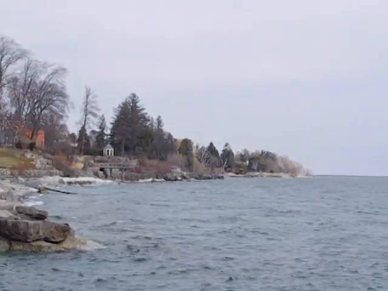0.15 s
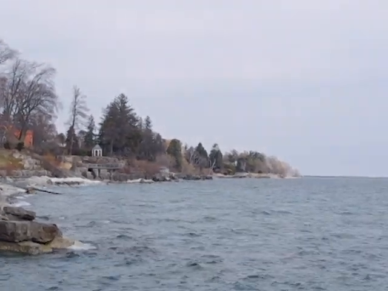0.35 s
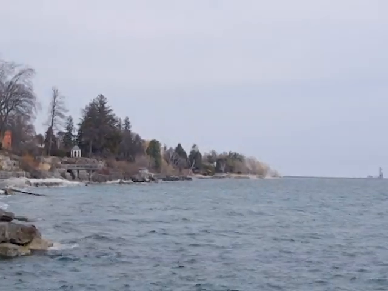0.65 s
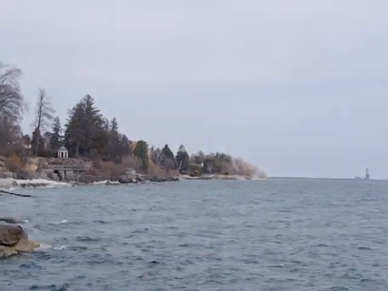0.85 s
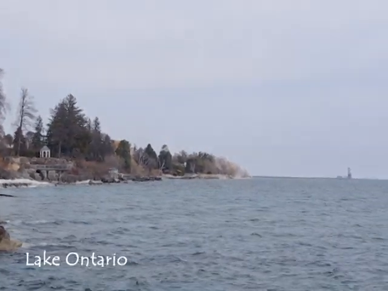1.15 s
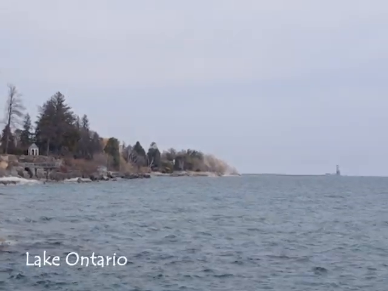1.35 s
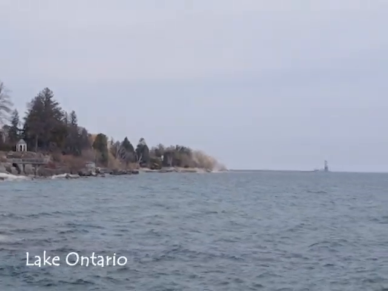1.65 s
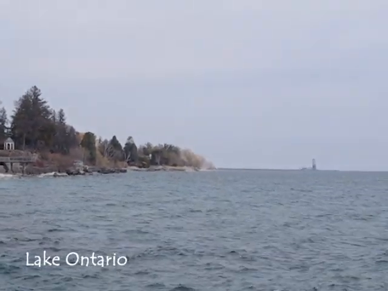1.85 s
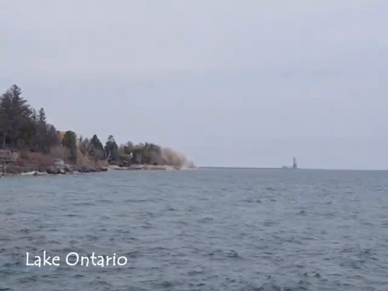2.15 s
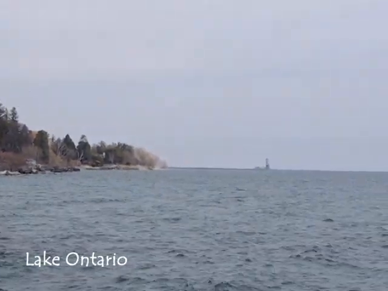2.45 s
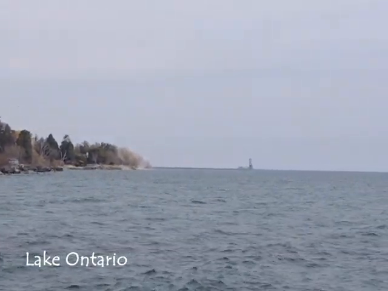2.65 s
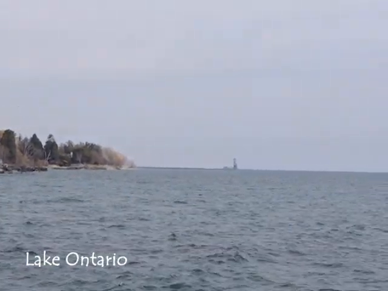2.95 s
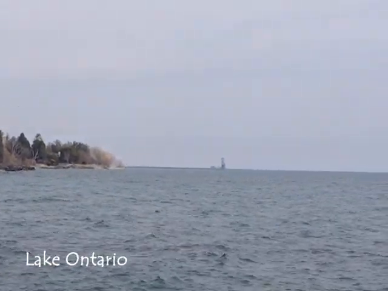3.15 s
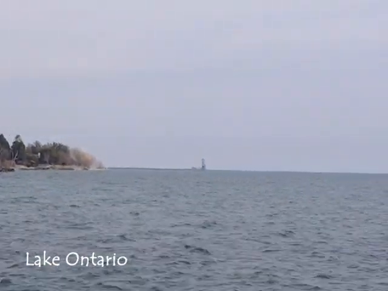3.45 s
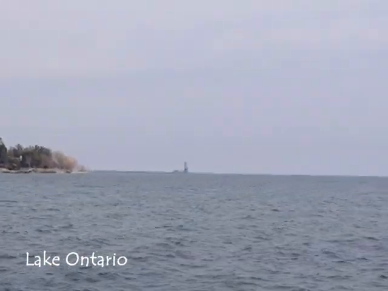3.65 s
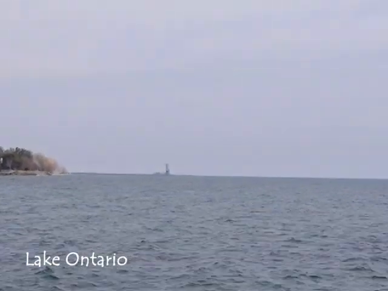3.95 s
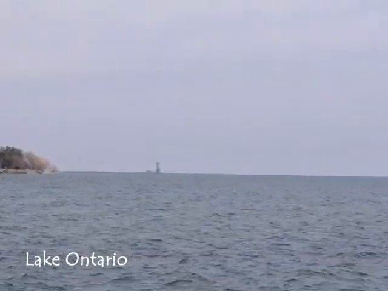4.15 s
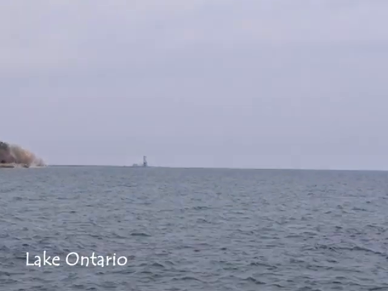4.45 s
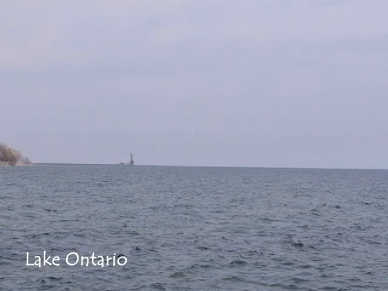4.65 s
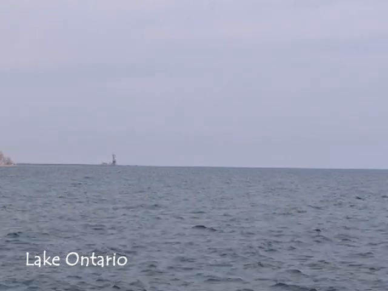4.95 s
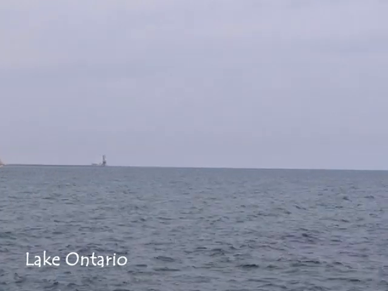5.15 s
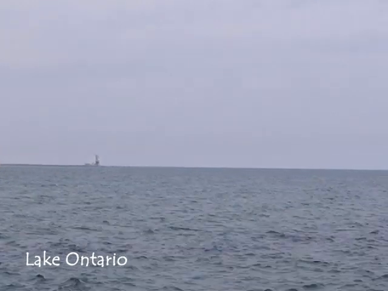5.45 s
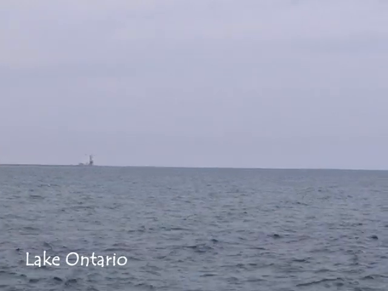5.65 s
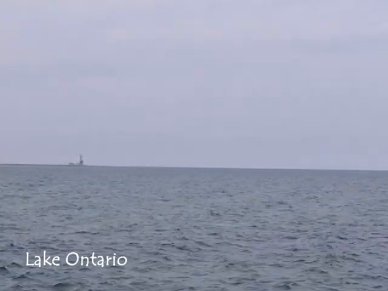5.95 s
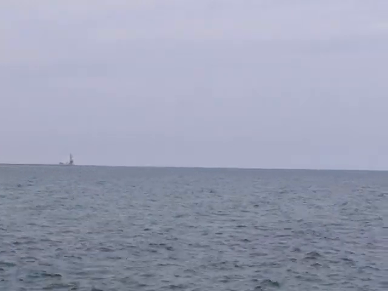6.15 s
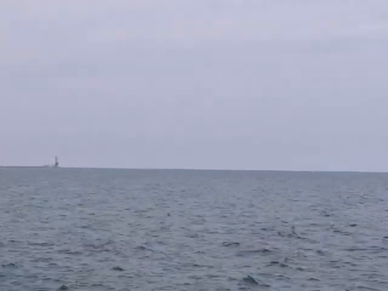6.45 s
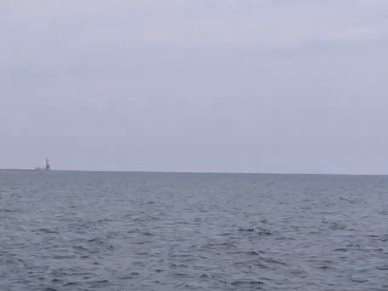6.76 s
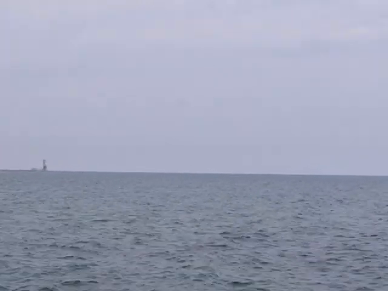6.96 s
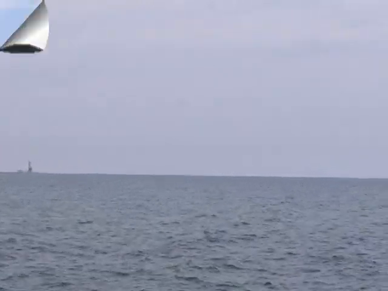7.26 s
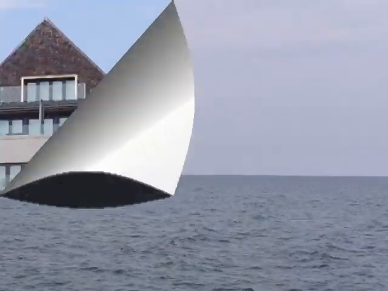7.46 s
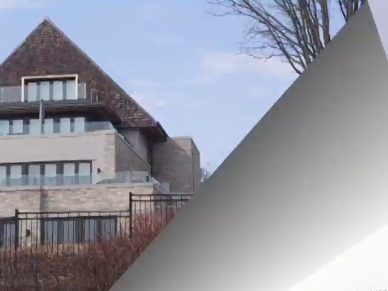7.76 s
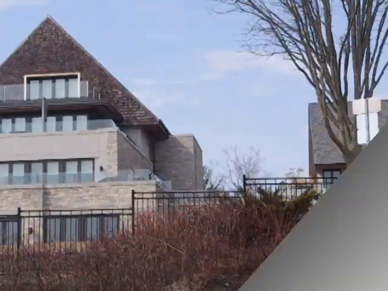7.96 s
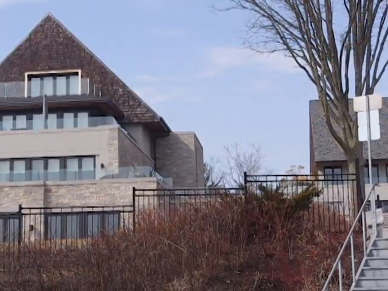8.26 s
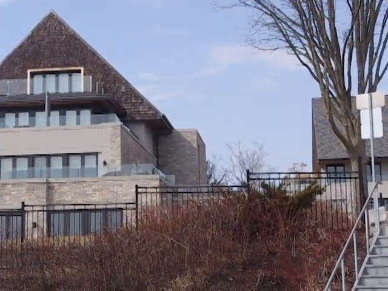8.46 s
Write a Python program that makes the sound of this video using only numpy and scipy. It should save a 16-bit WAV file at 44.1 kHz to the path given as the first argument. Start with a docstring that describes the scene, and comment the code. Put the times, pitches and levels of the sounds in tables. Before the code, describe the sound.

Restless small waves rush over shoreline rocks with hissing spray, plops and ticking droplets, as wind buffets a small microphone throughout, then sudden silence.

```python
"""Choppy lake water washes a stone wall and rocks, with fizzing spray, bubbles, near drops and wind throughout.
Wash and spray are noise in drifting third-octave bands; bubbles, gulps and drops are short rings.
Wind on one small microphone adds low noise in gusts, ringing thumps and slow pressure pushes.
A limiter ducks the strongest peaks, above all the deepest pushes; the sound stops short into silence."""
import sys
import numpy as np
from scipy import signal
from scipy.io import wavfile

SR = 44100
rng = np.random.default_rng(int(sys.argv[2]) if len(sys.argv) > 2 else 0)


def master(y):
    """Save y as 16-bit WAV."""
    cut = np.clip(np.atleast_2d(y).T, -1, 1)
    pcm = np.round(cut * 32767)  # scale
    wavfile.write(sys.argv[1], SR, pcm.astype(np.int16))


N = 378819      # samples, about 8.6 s

# All levels stand ahead of the microphone and the limiter.
# swell of the water at the wall: t/s, wash level/dB, spray level/dB
WATER_SWELL = [(0.0, -34.5, -27.5), (0.08, -27, -28), (0.2, -30, -32), (0.6, -29, -30), (0.88, -31, -36.5),
               (1.2, -30, -35), (1.5, -33, -36.5), (1.93, -31, -36.5), (2.66, -28.5, -32.5),
               (2.95, -25.5, -28), (3.25, -27, -28), (3.63, -25.5, -28), (3.96, -28.5, -32.5),
               (4.95, -28, -32), (5.5, -29.5, -32), (5.8, -27, -29.5), (6.45, -27.5, -28),
               (6.8, -29.5, -28), (7.1, -30.5, -33), (7.72, -31, -32.5)]
# wavelets slapping the rocks: t/s, change of wash level/dB, change of spray level/dB
SLAPS = [(0.99, 2, 3), (1.3, 3, 5), (1.36, 3, 4.5), (1.44, 1.5, 3.5), (2.12, -1, 3), (2.735, 1.5, 1.5),
         (3.07, 3, -5), (3.14, 0, 0.3), (4.45, 0.5, 0), (5.135, 6, -0.5), (5.72, 3, 4.5), (6.19, 1.5, 1),
         (6.6, 0, 5), (6.72, 5, 2.5), (6.985, 4.5, 1.5), (7.052, 2, 3.5), (7.151, 0.5, 5)]
# fineness of the spray: t/s, lift of its top octave level/dB
SPRAY_FINENESS = [(0, 3.5), (1.2, 0), (3.5, 2), (5.3, 1.8), (6.2, -3.5), (7.72, 0.5)]
# colour of the wash: f/Hz, relative level per Hz/dB
WASH_SPECTRUM = [(200, -14), (350, -2.5), (550, 1), (800, -1.5), (1200, -4), (2000, -10.5), (2800, -12.5),
                 (4000, -33.5)]
# colour of the spray: f/Hz, relative level per Hz/dB
SPRAY_SPECTRUM = [(1500, 0), (2800, -1.5), (4000, -2.5), (6500, -5), (9000, -4.5), (12000, -8.5),
                  (15500, -3)]
# large bubbles and gulps between the rocks: t/s, peak level/dB, f/Hz
ROCK_GULPS = [(0.6852, -18, 2960), (2.7671, -20, 730), (2.8058, -21.5, 3047), (3.1999, -20.5, 1010),
              (4.0807, -19.5, 1110), (4.0905, -17, 460), (4.4514, -20, 998), (5.1287, -17.5, 1950),
              (5.1362, -13, 760), (5.2179, -19, 2200), (5.267, -20, 342), (5.345, -18, 364),
              (5.7275, -20.5, 1268), (6.2005, -18.5, 670), (6.5881, -15, 1220), (6.6584, -23, 921),
              (6.7202, -14.5, 715), (6.9367, -21, 1487), (6.9927, -19, 474), (7.1431, -20, 1060),
              (7.1476, -19, 1900), (7.185, -23, 304), (7.3187, -18, 2215), (7.432, -22.5, 790)]
# drops ticking on stone and water close by: t/s, peak level/dB, f/Hz
NEAR_DROPS = [(0.0579, -26, 8816), (0.2679, -14.5, 8384), (1.2849, -19, 6794), (1.3567, -21, 5563),
              (1.6451, -17.5, 5040), (2.1194, -17.5, 3700), (2.2415, -19, 6590), (2.294, -20, 8900),
              (2.394, -18, 11500), (2.7346, -8, 5160), (2.8386, -12, 9326), (4.0445, -12, 9450),
              (4.1326, -20, 8259), (4.1687, -14, 7303), (4.418, -21, 8926), (4.5448, -15, 8800),
              (4.7803, -18, 5329), (5.8495, -13, 8463), (6.0498, -14.5, 8659), (6.5518, -12, 7455),
              (6.5834, -16, 7723), (6.6079, -15.5, 4846), (6.6661, -9, 9081), (7.1477, -13.5, 8140),
              (7.3459, -12, 9600), (7.6689, -20, 5303), (7.6994, -20, 5700)]
# steady wind on the microphone: t/s, buffeting level/dB, rumble level/dB
STEADY_WIND = [(0.0, -34.5, -39.5), (0.45, -38, -45), (1.3, -35, -37), (1.7, -33, -27), (2.4, -40, -38.5),
               (2.9, -28.5, -33), (3.5, -28, -39), (4.0, -31, -33), (4.8, -31.5, -28.5), (5.45, -33.5, -41),
               (6.0, -38, -35), (6.4, -32, -26.5), (6.9, -36.5, -40), (7.2, -34.5, -33), (7.72, -37, -40)]
# gusts on the microphone: t/s, buffeting level/dB, rumble level/dB, rise and fall to 1/e each/s
WIND_GUSTS = [(0.26, -46, -38, 0.041), (0.554, -25, -26, 0.057), (1.09, -31, -35, .04),
              (1.57, -30, -27, 0.081), (1.96, -46, -37, 0.074), (2.286, -29.5, -41, 0.049),
              (2.56, -23, -28, 0.046), (2.957, -25.5, -30, 0.044), (3.39, -27, -31, 0.06),
              (3.732, -21, -36, 0.014), (4.138, -32, -29, 0.045), (4.557, -31, -26, 0.031),
              (4.896, -33, -18, 0.041), (5.105, -26, -26, 0.066), (5.307, -30.5, -38, 0.068),
              (5.723, -32, -36, 0.068), (6.766, -39, -27, 0.051), (7.004, -38, -20.5, 0.097),
              (7.54, -33, -19.5, 0.05)]
# eddies thumping the microphone: t/s, peak level/dB, f/Hz
EDDY_THUMPS = [(0.255, -21, 150), (0.5348, -14, 313), (0.554, -18, 342), (1.0944, -24, 140),
               (1.4704, -14.5, 227), (1.5412, -14.5, 230), (1.5615, -15, 170), (1.6, -17, 200),
               (1.6201, -14, 180), (2.4914, -16, 212), (2.5441, -12, 280), (2.5663, -16, 284),
               (2.65, -17, 170), (2.9291, -8, 446), (2.9463, -10, 307), (3.0046, -8.5, 274),
               (3.2971, -11, 282), (3.3652, -16, 392), (3.3724, -8.5, 335), (3.7075, -14, 260),
               (3.7245, -10, 288), (3.7754, -11, 335), (3.786, -14, 380), (3.842, -14, 350),
               (4.499, -16, 205), (4.5533, -14, 232), (4.572, -10.5, 260), (4.882, -15, 230),
               (4.9015, -16, 297), (5.0834, -11, 293), (5.0997, -15, 200), (5.112, -18, 290),
               (6.7693, -16, 159), (6.7808, -16, 198), (6.9474, -11.5, 188), (7.01, -28, 199),
               (7.105, -19, 160), (7.5515, -14.5, 236)]
# slow pressure pushes of the gusts: t/s, peak level/dB
PRESSURE_PUSHES = [(3.004, -12), (3.372, -12), (3.725, -4), (4.556, -13), (6.772, -10.5), (6.949, -5),
                   (7.013, -6.5)]
# colour of the buffeting: f/Hz, relative level per Hz/dB
BUFFET_SPECTRUM = [(80, -4), (160, -6), (300, 0), (450, -6.5), (800, -17)]
# colour of the deep rumble: f/Hz, relative level per Hz/dB
RUMBLE_SPECTRUM = [(20, -10), (60, 5), (100, -8), (200, -12.5)]

SLAP_RISE_S, SLAP_FALL_S = 0.03, 0.0097     # to 1/e
GULP_CYCLES, DROP_CYCLES, THUMP_CYCLES = 6.2, 3.7, 0.85     # width of each ring at half height
PORT_HZ, PORT_WIDTH_HZ, PORT_DB = 9520, 1530, 2     # resonance of the microphone port
ROLL_OFF_HZ = 9560      # the microphone falls steeply above this
STOP_S, CUTOFF_HZ = 7.7255, 15050       # end of the sound, top of the final band


def water():
    """Wash, bubbles and spray swell together with the slaps; the nearest gulps and drops ring on top."""
    slaps = sum(np.outer(db, hump(s, SLAP_RISE_S, SLAP_FALL_S)) for s, *db in SLAPS)
    wash_db, spray_db = in_time(WATER_SWELL) + slaps
    foam = bubbles(per_s=250, cycles=32, low_hz=375.0, high_hz=3400)
    body = wash() + from_db(-7.5) * foam
    return from_db(wash_db) * body + from_db(spray_db) * spray() + gulps() + drops()


def wash():
    """The broad rush of water on stone: noise whose bands flicker together and singly; rms 1."""
    return banded(rng.standard_normal((2, N)), WASH_SPECTRUM, shared_db=0.47, own_db=1.2, rate_hz=11)


def spray():
    """Fizz of noise and droplet clicks; finer drops hiss higher, so fineness lifts the top."""
    droplets = grainy(per_s=93, spread_db=6.0, share=0.15)
    fizz = banded(droplets, SPRAY_SPECTRUM, shared_db=0.82, own_db=1.0, rate_hz=35)
    top = signal.sosfilt(signal.butter(2, 7000, "high", fs=SR, output="sos"), fizz)
    lift = from_db(in_time(SPRAY_FINENESS)[0])
    return fizz + (lift - 1) * top


def bubbles(per_s, cycles, low_hz, high_hz):
    """Small bubbles born at random ring at 20 pitches, falling 60 dB in the given cycles; rms 1."""
    sizes = from_db(3.2 * np.minimum(rng.exponential(1, N), 5)) * rng.choice([-1, 1], N)
    born = rng.random(N) < per_s / SR
    pitch_index = rng.integers(0, 20, N)
    out = 0
    for k, hz in enumerate(np.geomspace(low_hz, high_hz, 20)):
        r = from_db(-60 * hz / (cycles * SR))
        w = 2 * np.pi * hz / SR
        strikes = sizes * born * (pitch_index == k) + 1e-18
        out = out + signal.lfilter([0, np.sin(w)], [1, -2 * r * np.cos(w), r * r], strikes)
    return rms_one(out)


def gulps():
    """Large bubbles between the rocks: several cycles of ringing in a weak flurry."""
    return bursts(ROCK_GULPS, GULP_CYCLES, skirt_db=-13, skirt_width=1.7)


def drops():
    """Drops close by: brief high rings in a strong flurry lasting more cycles than the gulps'."""
    return bursts(NEAR_DROPS, DROP_CYCLES, skirt_db=-5.5, skirt_width=4.1)


def wind():
    """Air moving over the microphone: buffeting and rumble in gusts, thumps and pressure pushes."""
    buffet = banded(rng.standard_normal((2, N)), BUFFET_SPECTRUM, shared_db=0.5, own_db=1.5, rate_hz=19.0)
    rumble = banded(rng.standard_normal((2, N)), RUMBLE_SPECTRUM, shared_db=5.0, own_db=2.0, rate_hz=18)
    steady = from_db(in_time(STEADY_WIND))
    gusts = sum(np.outer(from_db(db), hump(s, length_s, length_s)) for s, *db, length_s in WIND_GUSTS)
    buffet_gain, rumble_gain = np.hypot(steady, gusts)      # powers add
    return buffet_gain * buffet + rumble_gain * rumble + thumps() + pushes()


def thumps():
    """Eddies striking the microphone: less than a cycle of low ringing in a faint flurry."""
    return bursts(EDDY_THUMPS, THUMP_CYCLES, skirt_db=-27, skirt_width=4.0)


def pushes(rise_s=0.0039, fall_s=0.029):
    """One-sided pressure on the diaphragm, with a quick rise and slower fall (each to 1/e)."""
    return sum(from_db(peak_db) * hump(s, rise_s, fall_s) for s, peak_db in PRESSURE_PUSHES)


def microphone(x):
    """The port resonance lifts a band near the top, then the response falls away."""
    r = np.exp(-np.pi * PORT_WIDTH_HZ / SR)
    feed = (1 - r * r) / 2 * np.array([1, 0, -1])
    back = [1, -2 * r * np.cos(2 * np.pi * PORT_HZ / SR), r * r]
    lifted = x + from_db(PORT_DB) * signal.lfilter(feed, back, x)
    return signal.sosfilt(signal.butter(5, ROLL_OFF_HZ, fs=SR, output="sos"), lifted)


def banded(source, spectrum, shared_db, own_db, rate_hz):
    """Third-octave bands of a source, each with its level, a shared swell and its own flicker; rms 1."""
    hz_low, hz_high = spectrum[0][0], min(spectrum[-1][0], .45 * SR)
    edges = hz_low * 2 ** np.arange(0, np.log2(hz_high / hz_low) + .2, 1 / 3)
    out, together = 0, drift(rate_hz)
    for k, (low, high) in enumerate(zip(edges, edges[1:])):
        band_filter = signal.butter(2, [low, high], "band", fs=SR, output="sos")
        band = signal.sosfilt(band_filter, source[k % 2])       # neighbours use different draws
        level_db = at_hz(spectrum, np.sqrt(low * high))
        out = out + from_db(level_db + shared_db * together + own_db * drift(rate_hz)) * band
    return rms_one(out)


def grainy(per_s, spread_db, share):
    """Two white noises over one clustered scatter of uneven clicks; share is the clicks' part of the power."""
    sizes = from_db(spread_db * np.minimum(rng.exponential(1, N), 4.5)) * rng.choice([-1, 1], N)
    density = per_s * from_db(5.0 * drift(4.0)) / SR
    clicks = rms_one(sizes * (rng.random(N) < density))
    share = np.clip(share, 0, 1)
    return np.sqrt(share) * clicks + np.sqrt(1 - share) * rng.standard_normal((2, N))


def bursts(table, cycles, skirt_db, skirt_width):
    """Each row is a bell-shaped ring inside a longer, weaker flurry of noise around its pitch."""
    out, t = np.zeros(N), np.arange(-2000, 2000) / SR
    noise = rng.standard_normal((len(table), len(t)))
    phase = rng.uniform(0, 2 * np.pi, len(table))
    for (s, peak_db, hz), hiss, start in zip(table, noise, phase):
        bell = lambda turns: .5 ** ((2 * t * hz / turns) ** 2)
        edges = [hz / 2.14, min(hz * 1.76, .45 * SR)]
        flurry = rms_one(signal.sosfilt(signal.butter(2, edges, "band", fs=SR, output="sos"), hiss))
        ring = bell(cycles) * np.cos(2 * np.pi * hz * t + start)
        shape = ring + from_db(skirt_db) * bell(skirt_width * cycles) * flurry
        first = round(s * SR) - 2000
        out[first:][:len(t)] += from_db(peak_db) * shape / np.abs(shape).max()
    return out


def drift(rate_hz):
    """Slow chance: noise through a double one-pole low-pass, worked at SR / 20; rms 1."""
    r = np.exp(-40 * np.pi * rate_hz / SR)
    noise = rng.standard_normal(N // 20 + 2002)
    slow = signal.lfilter([1], [1, -2 * r, r * r], noise)[2000:]      # past the filter's start
    return np.interp(np.arange(N) / 20, np.arange(len(slow)), rms_one(slow))


def hump(s, rise_s, fall_s):
    """A bell in time of height 1 at s, with its own rise and fall."""
    t = np.arange(N) / SR
    return np.exp(-((t - s) / np.where(t < s, rise_s, fall_s)) ** 2)


def in_time(rows):
    """Curve columns at every sample."""
    s, *columns = np.transpose(rows)
    return [np.interp(np.arange(N) / SR, s, c) for c in columns]


def at_hz(points, hz):
    """A spectrum read on a log-frequency axis."""
    point_hz, point_db = np.array(points).T
    return np.interp(np.log(hz), np.log(point_hz), point_db)


def from_db(db):
    """Gain of a level in dB."""
    return 10 ** (np.asarray(db) / 20)


def rms_one(x):
    """Scaled to rms 1."""
    return x / np.sqrt(np.mean(x ** 2) + 1e-20)


def scene():
    """Water and wind at one point, the same in both channels."""
    return np.tile(water() + wind(), (2, 1))


def record(dry, limit_db=-12.5, release_db_s=260, attack_s=0.0012, bass_cut_hz=140):
    """A limiter acts on the full pressure, then the bass is cut, the sound stops and the top is cut."""
    heard = microphone(dry)
    r = np.exp(-1 / (attack_s * SR))
    smooth = lambda x: signal.lfilter([1 - r], [1, -r], x)
    power_db = 10 * np.log10(smooth(heard[0] ** 2) + 1e-12)
    over = np.maximum(power_db - limit_db, 0)
    ramp = release_db_s * np.arange(N) / SR
    held = np.maximum.accumulate(over + ramp) - ramp      # falls back at a steady dB rate
    limited = heard * from_db(-smooth(held))
    cut = signal.sosfilt(signal.butter(3, bass_cut_hz, "high", fs=SR, output="sos"), limited)
    cut = cut * np.clip((STOP_S - np.arange(N) / SR) * 1000, 0, 1)      # 1 ms fade to the stop
    return signal.sosfilt(signal.ellip(12, .5, 70, CUTOFF_HZ, fs=SR, output="sos"), cut)


dry = scene()
out = record(dry)
master(out)
```